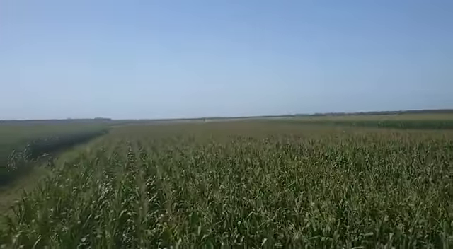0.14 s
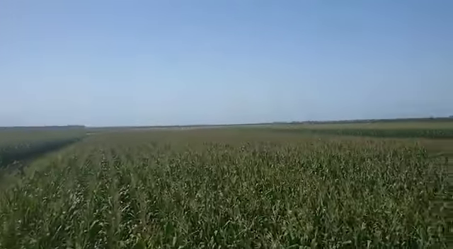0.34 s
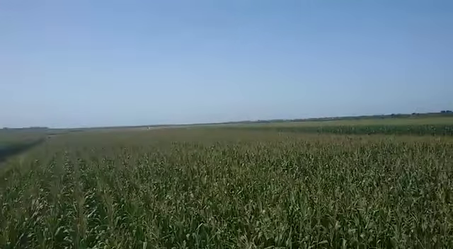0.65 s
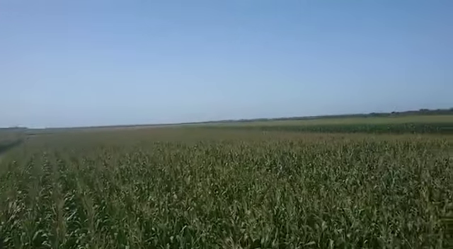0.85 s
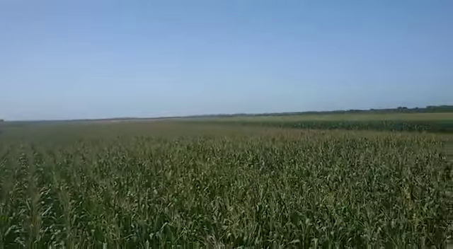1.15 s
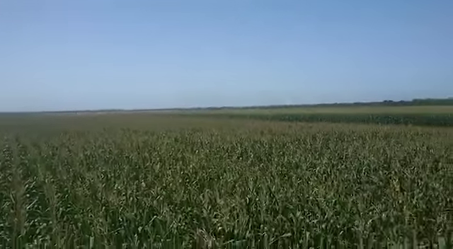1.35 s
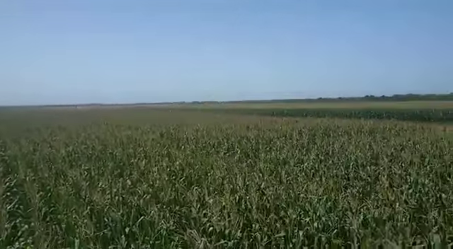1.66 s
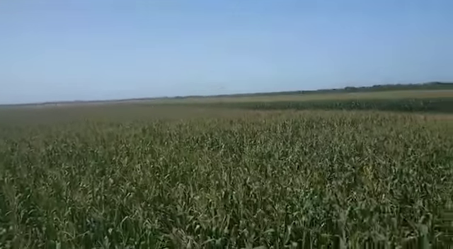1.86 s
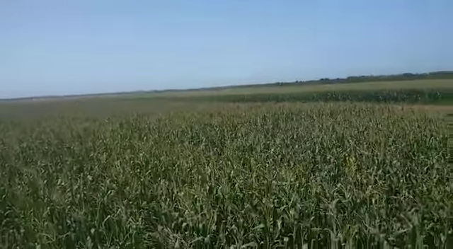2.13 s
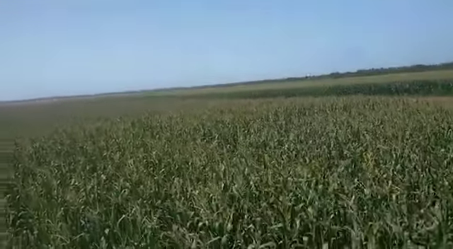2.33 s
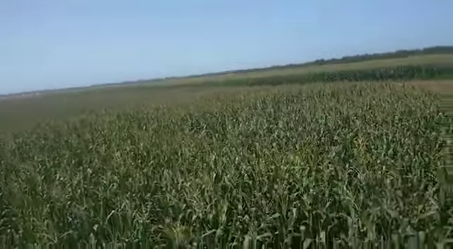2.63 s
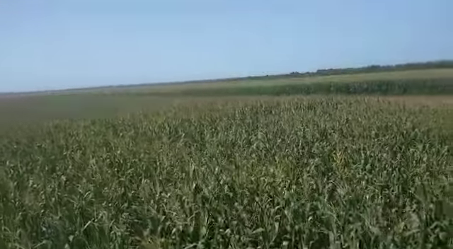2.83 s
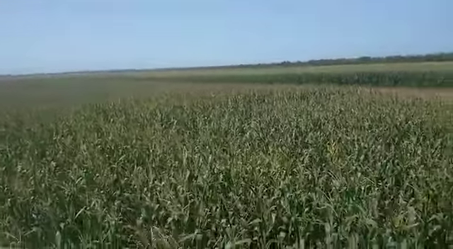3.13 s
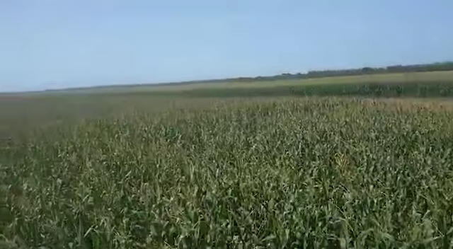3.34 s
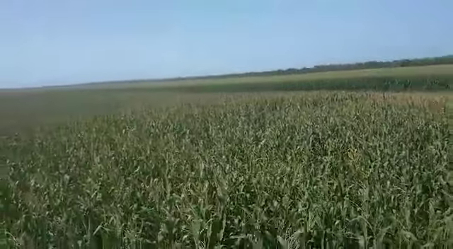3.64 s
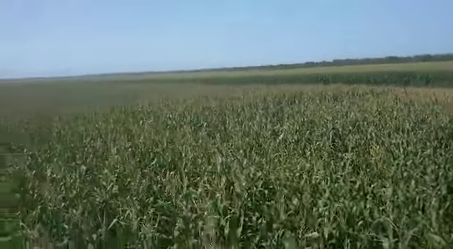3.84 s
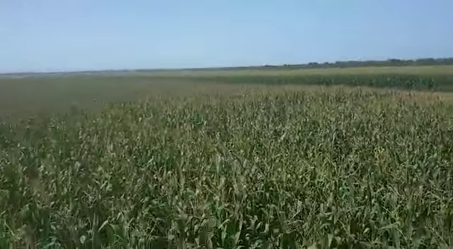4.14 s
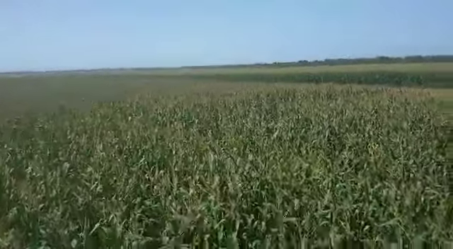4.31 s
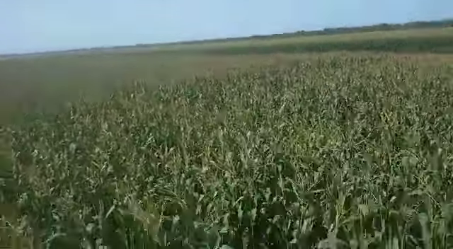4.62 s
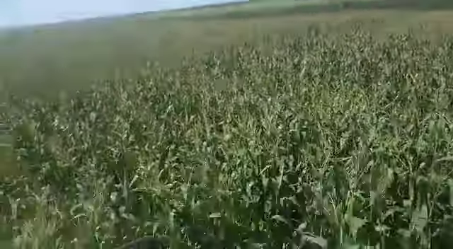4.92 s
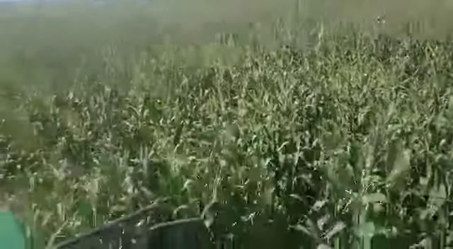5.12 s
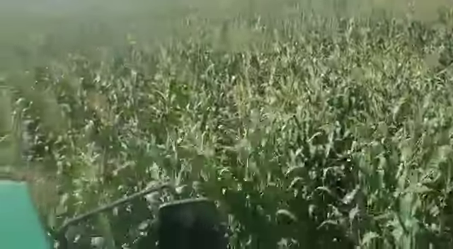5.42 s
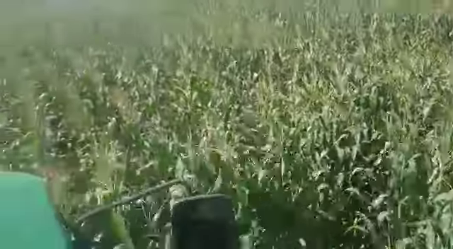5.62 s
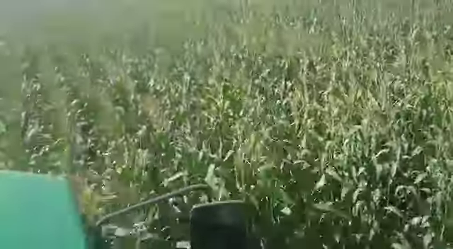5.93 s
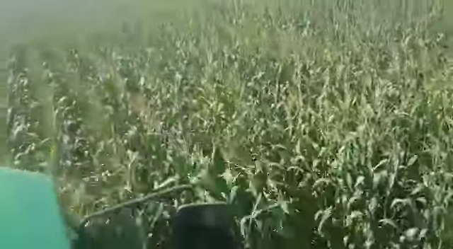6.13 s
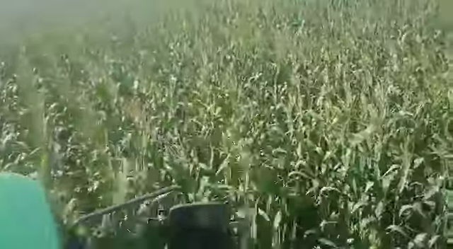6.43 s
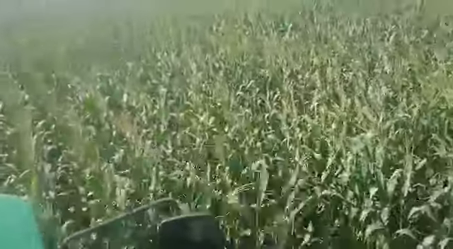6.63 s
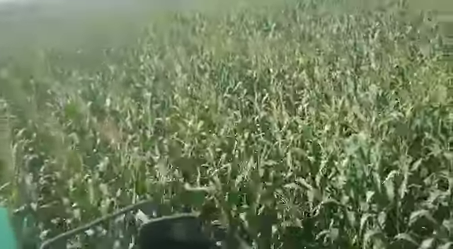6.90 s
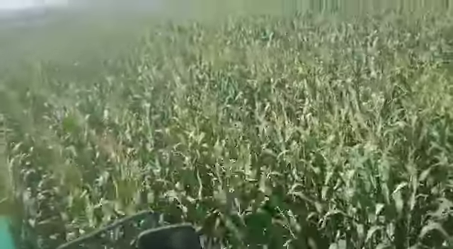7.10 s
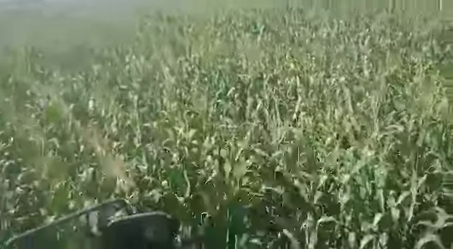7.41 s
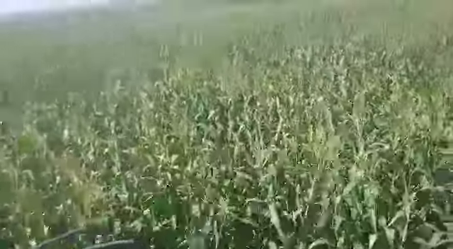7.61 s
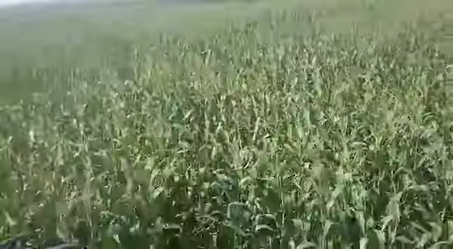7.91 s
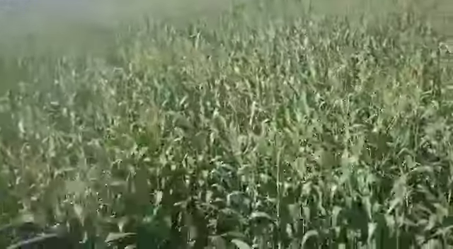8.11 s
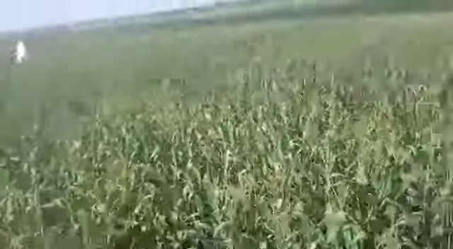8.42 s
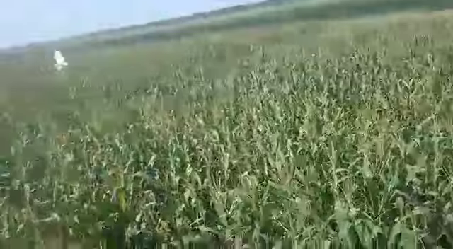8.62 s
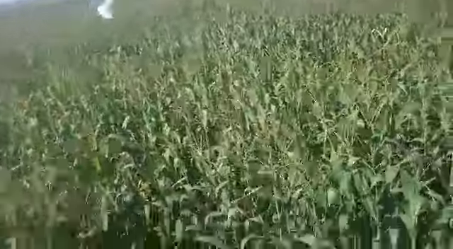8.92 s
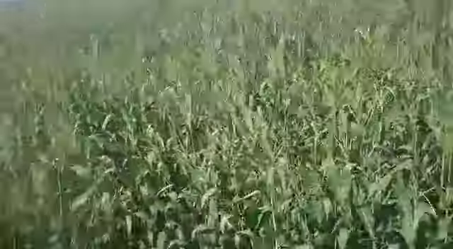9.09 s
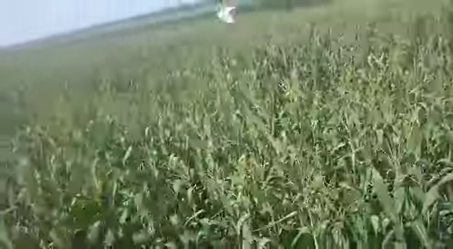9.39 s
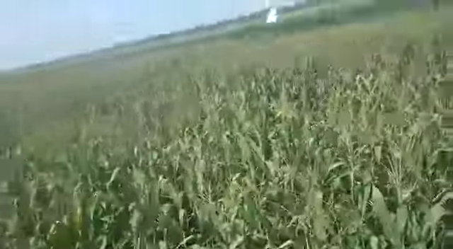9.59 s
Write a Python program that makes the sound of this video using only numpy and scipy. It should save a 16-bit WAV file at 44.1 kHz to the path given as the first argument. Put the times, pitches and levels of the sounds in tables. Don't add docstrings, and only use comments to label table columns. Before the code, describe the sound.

A forage harvester drones loudly from inside its cab, with a horn's last buzz, constant gear clatter, sharp knocks and leaves rattling on glass.

```python
import sys
import numpy as np
from scipy import signal
from scipy.fft import rfft, irfft
from scipy.io import wavfile
from scipy.ndimage import uniform_filter1d

SR = 44100
rng = np.random.default_rng(int(sys.argv[2]) if len(sys.argv) > 2 else 0)


def master(y):
    cut = np.clip(np.atleast_2d(y).T, -1, 1)
    pcm = np.round(cut * 32767)
    wavfile.write(sys.argv[1], SR, pcm.astype(np.int16))


def gain_from_decibels(decibels):
    exponent = np.asarray(decibels, float) / 20
    return 10 ** exponent


N = 429975
TIME = np.arange(N) / SR
STEPS = np.arange(N // 441 + 2) * 441 / SR
FIRINGS = 12
EDGE_S = 0.22

# (time [s], firing rate [Hz], firing tone level [dB])
ENGINE_LOAD = [(0, 220, -13), (.95, 222.1, -14.5), (1.35, 223.6, -13.5), (1.7, 224.3, -12.5),
               (2.15, 220.7, -15), (2.9, 221.8, -14), (3.3, 224.4, -12.5), (4.15, 227.1, -12.5),
               (4.85, 224.9, -12), (5.15, 220.6, -13), (5.8, 220.8, -13), (6.15, 220.4, -14),
               (6.55, 220.6, -13), (6.85, 225.1, -12), (7.25, 221.9, -12), (8.3, 225, -13.5),
               (9.0, 221.1, -15), (9.75, 220.9, -17.5)]


def engine_state():
    firing_hz, firing_db = columns(ENGINE_LOAD, STEPS)
    sag_hz = firing_hz.mean() - firing_hz
    swing_db = firing_db - firing_db.mean()
    return firing_hz, sag_hz, swing_db


def engine_cycles():
    firing_hz = uniform_filter1d(engine_state()[0], size=9)
    return np.cumsum(fine(firing_hz)) / FIRINGS / SR + .2


# (time [s], facing [0 side window - 1 crop ahead], crop flow [dB])
FACING_AND_FLOW = [(0, 0.077, 0.5), (1, 0.3, 0), (2, 0, -0.05), (3.2, 0.062, 0.85), (3.8, 0.19, -0.05),
                   (4.1, .8, -0.7), (4.6, 0.6, 0.5), (5.1, 0.99, 0), (6.1, 0.98, -0.35), (6.7, 0.99, -0.1),
                   (7.5, 1, 0.35), (8.3, 1, 0.7), (9.1, 1, 0.85), (9.75, 0.8, 0.3)]


def facing_and_flow(t):
    return columns(FACING_AND_FLOW, t)


# (order [per cycle], sag gain [dB/Hz], gain facing the crop [dB], drop per firing tone rise [dB/dB])
CAB_MODES = [(6, .4, -1.5, 0), (9, -0.2, -1.5, -0.5), (10, 0.5, 2.5, -1), (13, 1.5, 13, -1),
             (14, 0, 4, -2.5), (15, 2.24, -2.5, -0.1), (16, 0.7, -3, -0.3), (18, 2.5, -7, 0)]


def cab_gains():
    _, sag_hz, swing_db = engine_state()
    facing, _ = facing_and_flow(STEPS)
    sways = drift(1.5, count=len(CAB_MODES))
    gains = {}
    for (order, per_hz, ahead_db, per_db), sway in zip(CAB_MODES, sways):
        order = round(order)
        node_db = -4.5 if order in (13, 14, 18) else 0
        gains[order] = per_hz * sag_hz + ahead_db * (facing - .5) - per_db * swing_db + node_db + 1.0 * sway
    return gains


def firing_lag(order):
    if order > 18:
        return rng.random()
    return order % 2 * np.sign(order - FIRINGS) / 4 + .12 * rng.random()


def any_lag(order):
    return rng.random()


# (order [per cycle], level [dB])
ENGINE_TONES = [(3, -45.5), (4, -46.5), (6, -26), (8, -45), (9, -28), (10, -22.5), (11, -37.5), (12, -14),
                (13, -37.5), (14, -32), (15, -28), (16, -27.5), (18, -29.5), (24, -46), (28, -39.5),
                (30, -40.5), (32, -46), (33, -49), (36, -47.5), (38, -42), (42, -40.5), (44, -50.5),
                (45, -40.5), (51, -52), (52, -38), (66, -41), (72, -70)]


def engine():
    gains = cab_gains()
    gains[12] = engine_state()[2]
    gains[66] = crop_load()[1]
    return tones(engine_cycles(), ENGINE_TONES, gains, waver_db=0.47, blur=0.021, lag=firing_lag)


# (start [s], length [s], knife tone [dB], overtones and gear [dB])
SWATH_SPELLS = [
    (1.7, 0.46, 5.5, 9.5),
    (2.8, 0.56, 3, -1),
    (4.3, 0.81, 1, 9),
    (5.9, 0.42, 3.5, 6),
    (6.7, 0.51, 4, 11.5),
    (7.4, 1.39, 5, 11),
    (8.8, 1.24, 10, 9),
]


def crop_load():
    knife_db, overtone_db = spells(SWATH_SPELLS)
    return knife_db - 1.5, overtone_db - 2


# (harmonic [number], level [dB])
KNIFE_TONES = [(1, -27.5), (2, -35.5), (3, -40), (4, -42), (5, -44.5), (6, -45.5), (7, -49)]


def knife_drum():
    knife, overtones = crop_load()
    gains = {1: knife, 2: knife / 2 + 2}
    gains.update({harmonic: overtones for harmonic in range(3, 8)})
    return tones(13.43 * engine_cycles(), KNIFE_TONES, gains, waver_db=2.0, blur=0.43, lag=any_lag)


# (harmonic [number], level [dB])
PUMP_TONES = [(1, -33), (2, -40.5), (3, -33), (4, -52.5), (5, -61), (6, -47)]
# (start [s], length [s], pump tone [dB], third harmonic [dB])
VALVE_SPELLS = [
    (-.2, 1.7, 14, 0),
    (1.45, .5, 0, 3),
    (2.0, 0.28, 3, -6),
    (4.1, 0.58, -4, -2),
    (4.75, 0.53, 20.5, -1.5),
    (5.35, 0.49, 17.5, -6),
    (5.85, 0.86, 4, -7),
    (7.0, 1.85, 9, -1),
    (9.0, 1.01, 20.5, -6),
]


def hydraulic_pump():
    pump_db, third_db = spells(VALVE_SPELLS)
    pump_db, third_db = pump_db - 15, third_db + 2.5
    gains = {1: pump_db, 3: third_db, 6: third_db}
    return tones(28.67 * engine_cycles(), PUMP_TONES, gains, waver_db=1.3, blur=0.16, lag=any_lag)


# (harmonic [number], level [dB])
BLOWER_TONES = [(1, -33.5), (2, -31.5), (3, -37.5), (5, -67)]


def blower():
    return tones(6.875 * engine_cycles(), BLOWER_TONES, {}, waver_db=3.5, blur=0.15, lag=any_lag)


def tones(turns, table, gains_db, waver_db, blur, lag):
    level, phase = drift(6.7, count=len(table)), drift(12, count=len(table))
    out = np.zeros(N)
    for k, (order, db) in enumerate(table):
        order = round(order)
        slip = fine(blur * np.sqrt(order) * phase[k])
        angle = 2 * np.pi * (order * turns - lag(order)) + slip
        level_db = db + gains_db.get(order, 0) + waver_db * level[k]
        out += fine(gain_from_decibels(level_db)) * np.cos(angle)
    return np.sqrt(2) * out


# (time [s], peak [dB], pitch [Hz], 60 dB decay [s])
HOUSING_KNOCKS = [(1.392, -4, 1700, 0.037), (1.4707, -7, 1610, 0.064), (2.0467, -7, 1710, 0.061),
                  (2.8624, -10.5, 1320, 0.13), (5.88, -3, 1181, 0.068), (6.064, -4.5, 1201, 0.054),
                  (7.2108, -7, 1610, 0.071), (7.341, -7, 1160, 0.074), (7.783, -1.5, 1256, 0.062),
                  (8.081, -10, 1200, 0.12), (8.4002, -15, 1219, 0.095), (8.63, -11, 1175, 0.075),
                  (9.13, -6.5, 1504, 0.092)]
# (time [s], peak [dB], pitch [Hz], 60 dB decay [s])
HOUSING_RINGS = [
    (1.138, -2, 2310, .012),
    (1.389, -3, 1930, 0.042),
    (1.96, -10, 2042, .08),
]


def knocks():
    out, t = np.zeros(N), np.arange(14000) / SR
    for s, db, hz, t60 in HOUSING_KNOCKS + HOUSING_RINGS:
        attack = np.minimum(t / (0.043 * t60), 1)
        blow = gain_from_decibels(db - 4.5 - 60 * t / t60) * np.sin(2 * np.pi * hz * t) * attack
        add_at(out, s, blow)
    return out


# (time [s], peak [dB], pitch [Hz])
GLASS_RATTLES = [(4.173, -29, 6330), (4.3822, -29, 5930), (4.5289, -29, 5830), (5.0995, -34, 5565),
                 (5.1784, -29, 5100), (5.2632, -30, 4765), (5.7444, -24, 6020), (6.0444, -26.5, 6220),
                 (6.2946, -31, 5834), (6.5963, -28, 4920), (6.87, -30, 5134), (7.2369, -41, 4373),
                 (7.6706, -24.5, 5804), (7.777, -23.5, 4830), (8.0933, -24, 4538), (8.269, -29, 5146),
                 (8.433, -27, 5666), (8.628, -26, 4776), (8.7553, -30, 5367), (8.881, -24, 5540),
                 (9.0536, -30, 5290), (9.152, -25, 4920), (9.2183, -30, 5980), (9.4232, -28, 4870)]


def rattles():
    out, t = np.zeros(N), np.arange(4000) / SR
    clicks = rng.standard_normal((len(GLASS_RATTLES), len(t), 2)).prod(2)
    for (s, db, hz), row in zip(GLASS_RATTLES, clicks):
        envelope = gain_from_decibels(db - 9.5 - 60 * t / 0.33) * np.minimum(t / 0.0072, 1)
        add_at(out, s, evened(ring(row, hz, width_hz=1100)) * envelope)
    return out


# (frequency [Hz], rms level of each overtone [dB])
HORN_COLOUR = [(400, -44), (2000, -43), (2400, -36), (3200, -35), (3700, -58), (6300, -64), (7200, -56),
               (12000, -66)]


def horn():
    end_s, release_s = .205, .02
    t, hz = TIME[:SR // 2], 398.4 * np.arange(1, 31)[:, None]
    level_db = colour_db(HORN_COLOUR, hz, offset=0)
    buzz = gain_from_decibels(level_db) * np.sin(2 * np.pi * (hz * t + rng.random(hz.shape)))
    out = np.zeros(N)
    out[:len(t)] = np.sqrt(2) * buzz.sum(0) * np.clip((end_s - t) / release_s + .5, 0, 1)
    return out


# (start [s], length [s], top pitch [Hz], tone [dB], octave [dB])
TURBO_SPELLS = [
    (.12, .5, 6580, -62, -56),
    (.45, 1.0, 6735, -44.5, -55),
    (2.5, .75, 6560, -58, -55),
]


def turbo():
    out, wobble = np.zeros(N), fine(.8 * drift(30, count=1)[0])
    for start, length, top_hz, tone_db, octave_db in TURBO_SPELLS:
        along = (TIME - start) / length
        arch = 1 - .012 * np.clip(2 * along - 1, -1, 1) ** 2
        angle = 2 * np.pi * np.cumsum(top_hz * arch) / SR + wobble
        on = np.clip(np.minimum(along, 1 - along) * length / EDGE_S, 0, 1)
        out += on * (gain_from_decibels(tone_db) * np.sin(angle) + gain_from_decibels(octave_db) * np.sin(2 * angle))
    return out


# (frequency [Hz], density [dB])
CLATTER_COLOUR = [(380, -38), (460, -2), (620, -2), (900, -4.5), (1150, 0), (1300, -2), (1420, 0.5),
                  (1600, -1), (1900, 0), (2200, -5), (2600, -6.5), (3200, -9), (3600, -17.5), (4400, -55)]
# (frequency [Hz], density [dB])
HISS_COLOUR = [(3000, -25), (3800, 5), (4600, -4.5), (6000, -1), (7400, -2), (8400, -3.5), (9200, -8)]
# (frequency [Hz], density [dB])
CHAFF_COLOUR = [(7800, -12.5), (9200, 2), (10500, 2.5), (12000, 1), (13500, -3), (14400, -3.5),
                (15500, -52)]
# (start [s], length [s], level [dB])
CHAFF_CLOUDS = [
    (0, 1.6, -1.5),
    (1.9, 1.5, 1),
    (3.5, 0.33, 2.5),
    (5.1, .25, 2),
    (5.65, 0.19, 4),
    (5.9, 1.6, 2),
    (9.6, 0.38, 0),
]


def crop_stream():
    _, flow_db = facing_and_flow(STEPS)
    lumps = drift(56, count=1)[0]
    clatter_db = -20.5 + flow_db + 1.23 * lumps
    hiss_db = -41 + 1.4 * flow_db + 1.1 * lumps
    chaff_db = -46 + spells(CHAFF_CLOUDS)[0] + 0.3 * lumps
    out = fine(gain_from_decibels(clatter_db)) * noise(CLATTER_COLOUR, size=512, patchy_db=0.12, gusty_db=0.37)
    out += fine(gain_from_decibels(hiss_db)) * noise(HISS_COLOUR, size=512, patchy_db=1.0, gusty_db=0.7)
    out += fine(gain_from_decibels(chaff_db)) * noise(CHAFF_COLOUR, size=512, patchy_db=1.5, gusty_db=0.05)
    return out


# (frequency [Hz], width [Hz], level [dB])
CAB_PANELS = [(1245, 31, -31), (1588, 65, -35), (1010, 27, -38.5), (737, 58, -52), (493.7, 59, -35.5)]


def panels():
    _, flow_db = facing_and_flow(STEPS)
    out, shake = np.zeros(N), rng.standard_normal(N)
    swell = drift(4, count=len(CAB_PANELS))
    for (hz, width, db), wander in zip(CAB_PANELS, swell):
        out += fine(gain_from_decibels(db + 2.5 * flow_db + 1.8 * wander)) * evened(ring(shake, hz, width))
    return out


# (frequency [Hz], density [dB])
BOOM_COLOUR = [(270, -20), (315, -6), (345, 4), (385, 1), (410, -8.5), (450, -7.5), (520, -18)]
# (start [s], length [s], boom level [dB])
RUT_SPELLS = [
    (.55, 0.41, 3.5),
    (1.3, 0.53, -2),
    (2.05, 0.14, -0.5),
    (3.15, 0.34, -3),
    (3.55, .25, 1.5),
    (3.85, 0.27, -8),
    (5.5, 0.38, 0),
    (5.95, 0.37, 3.5),
    (6.75, 0.36, -4),
    (9.4, .4, 0.5),
]


def boom():
    facing, _ = facing_and_flow(STEPS)
    jolts = drift(4.5, count=1)[0]
    boom_db = -20.5 - 4.5 * facing + 0.2 * engine_state()[1] + 1.75 * jolts + spells(RUT_SPELLS)[0]
    return fine(gain_from_decibels(boom_db)) * noise(BOOM_COLOUR, size=2048, patchy_db=0.44, gusty_db=0.5)


# (frequency [Hz], density [dB])
RUMBLE_COLOUR = [(25, -29), (42, -29), (58, -30), (80, -13.5), (108, 3), (135, -6.5), (155, 2), (200, -5),
                 (260, -8), (310, -7.5), (450, -18), (600, -25)]


def rumble():
    return gain_from_decibels(-23) * noise(RUMBLE_COLOUR, size=4096, patchy_db=0.3, gusty_db=1.4)


# (frequency [Hz], gain [dB])
FACING_COLOUR = [(450, -0.5), (800, 2.3), (1400, 1.1), (2500, -1.04), (5200, 3), (7500, 0.5), (10500, -1.5),
                 (13500, 2.5)]


def noise(colour, size, patchy_db, gusty_db):
    hop, hz = size // 4, np.fft.rfftfreq(size, 1 / SR)
    a, b, patches = rng.standard_normal((N // hop + 6, len(hz), 3)).T
    patches = uniform_filter1d(patches, size // 64, 0)
    patches = evened(uniform_filter1d(patches, 3000 // hop + 1, 1))
    gusts = evened(uniform_filter1d(rng.standard_normal(a.shape[1]), 2000 // hop + 1))
    shape_db = colour_db(colour, hz, 1, -90, -90)
    facing, _ = facing_and_flow(np.arange(a.shape[1]) * hop / SR)
    tint_db = np.outer(colour_db(FACING_COLOUR, hz, 1), facing)
    z = (a + 1j * b) * gain_from_decibels(shape_db[:, None] + tint_db + patchy_db * patches + gusty_db * gusts)
    return evened(signal.istft(z, nperseg=size, noverlap=size - hop)[1][:N])


def colour_db(rows, hz, offset, *outside):
    f, db = np.transpose(rows)
    return np.interp(np.log(hz + offset), np.log(f), db, *outside)


def evened(x):
    return x / np.sqrt(np.mean(x ** 2) + 1e-20)


def columns(rows, t):
    s, *values = np.transpose(rows)
    return [np.interp(t, s, v) for v in values]


def spells(rows):
    start, length, *values = np.transpose(rows)[:, :, None]
    on = np.clip(np.minimum(STEPS - start, start + length - STEPS) / EDGE_S + .5, 0, 1)
    return [(v * on).sum(0) for v in values]


def drift(top_hz, count):
    keep = np.fft.rfftfreq(len(STEPS), STEPS[1]) < top_hz
    slow = irfft(rfft(rng.standard_normal((count, len(STEPS)))) * keep, len(STEPS))
    return slow / slow.std(1, keepdims=True)


def fine(slow):
    return np.interp(TIME, STEPS, slow)


def ring(x, hz, width_hz):
    r = np.exp(-np.pi * width_hz / SR)
    return 2 * signal.lfilter([1 - r], [1, -r * np.exp(2j * np.pi * hz / SR)], x).real


def add_at(out, s, sound):
    part = out[round(s * SR):][:len(sound)]
    part += sound[:len(part)]


def scene():
    drive_line = engine() + knife_drum() + hydraulic_pump() + blower()
    strikes = knocks() + rattles()
    roar = crop_stream() + panels() + boom() + rumble()
    return (drive_line + strikes + horn() + turbo() + roar)[None]


# (time [s], peak [dB])
BRIGHT_CLICKS = [
    (.966, -47),
    (9.7335, -36),
]


def snaps():
    out, t = np.zeros(N), np.arange(700) / SR
    bright = signal.butter(4, 8500, "high", fs=SR, output="sos")
    for s, db in BRIGHT_CLICKS:
        burst = signal.sosfilt(bright, rng.standard_normal(len(t)))
        out[round(s * SR):][:len(t)] += gain_from_decibels(db) * np.hanning(len(t)) * burst
    return out


def thinned(x, gate_db, from_hz):
    hz, _, z = signal.stft(x, SR, "cosine", nperseg=2048)
    sink_db = 9 * np.maximum(from_hz - hz, 0) / 1000
    faint = abs(z) < gain_from_decibels(gate_db - sink_db)[:, None]
    treble = (hz > from_hz - 1500)[:, None]
    return signal.istft(z * ~(faint & treble), SR, "cosine", nperseg=2048)[1][:, :N]


def top_cut(x):
    return signal.sosfilt(signal.butter(12, 14410, fs=SR, output="sos"), x)


def record(dry):
    soft = dry / (1 + abs(dry) ** 6) ** (1 / 6)
    soft = signal.sosfilt(signal.butter(2, 30, "high", fs=SR, output="sos"), soft)
    mix = thinned(soft, gate_db=-64.5, from_hz=8870) + snaps()
    return top_cut(mix)


dry = scene()
out = record(dry)
master(out)
```